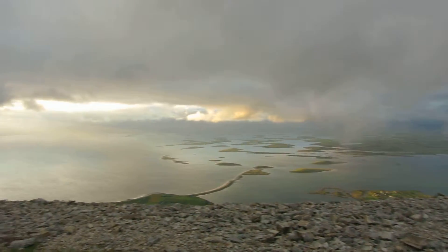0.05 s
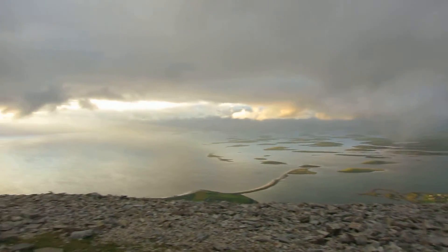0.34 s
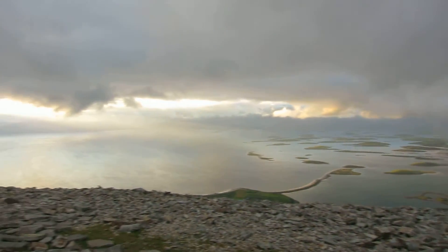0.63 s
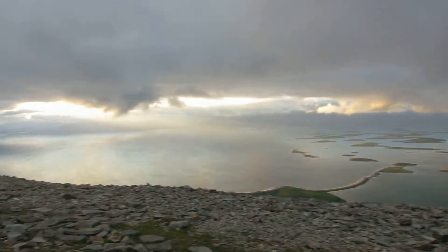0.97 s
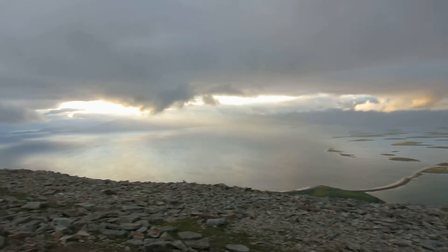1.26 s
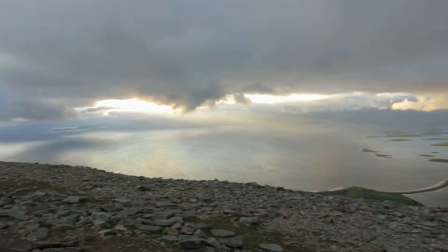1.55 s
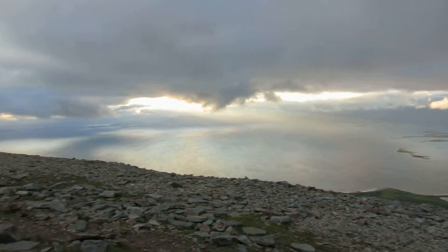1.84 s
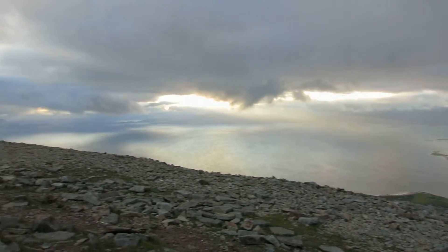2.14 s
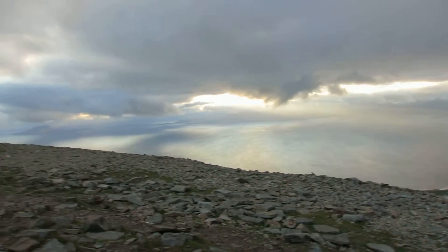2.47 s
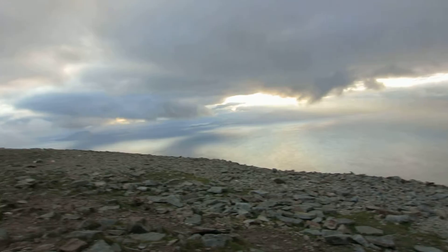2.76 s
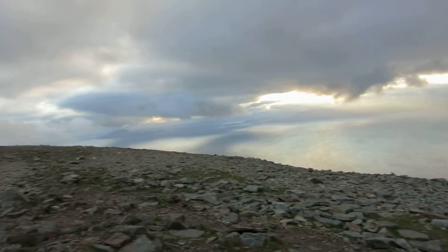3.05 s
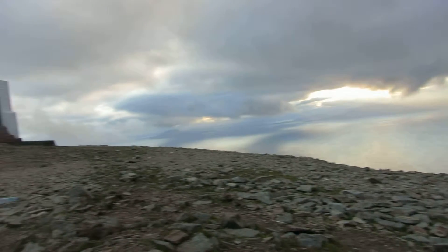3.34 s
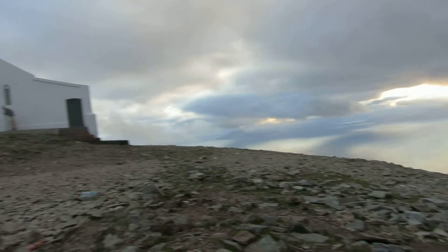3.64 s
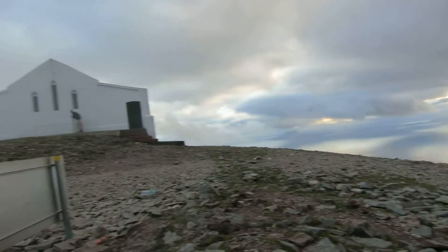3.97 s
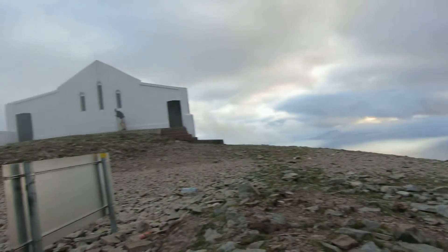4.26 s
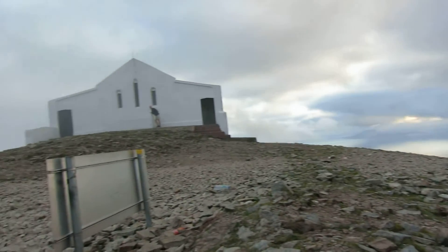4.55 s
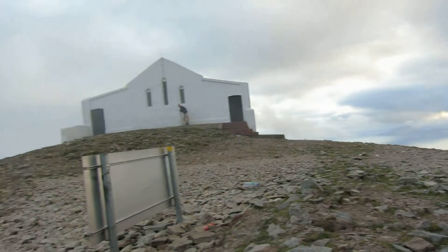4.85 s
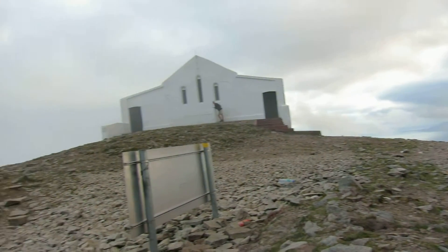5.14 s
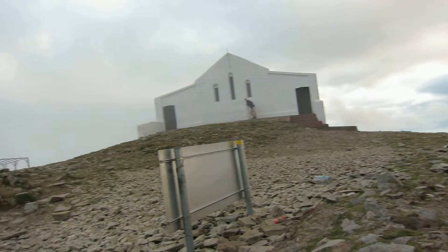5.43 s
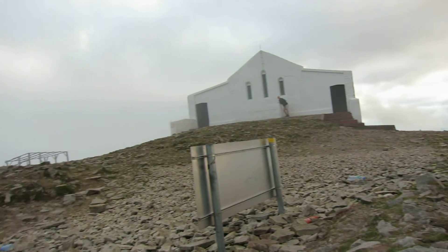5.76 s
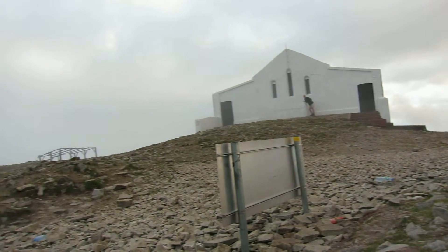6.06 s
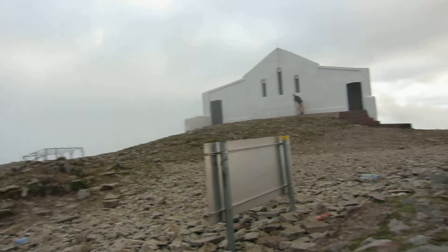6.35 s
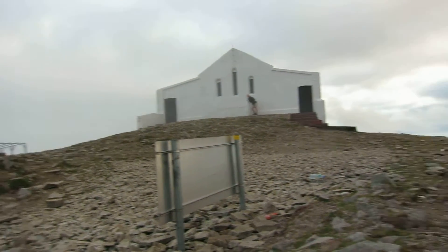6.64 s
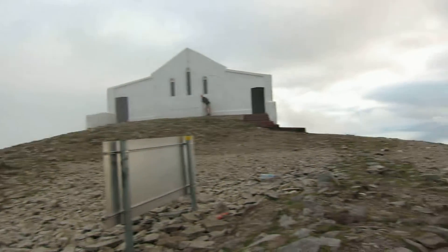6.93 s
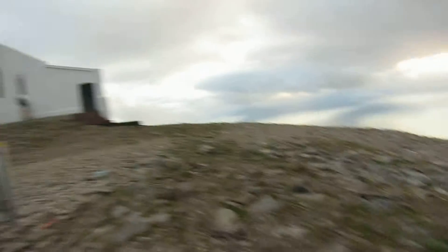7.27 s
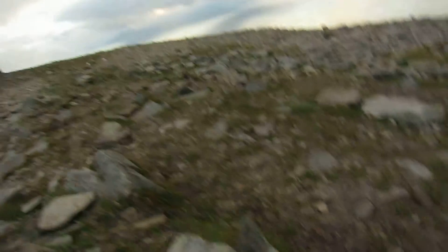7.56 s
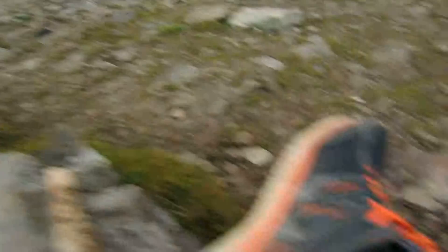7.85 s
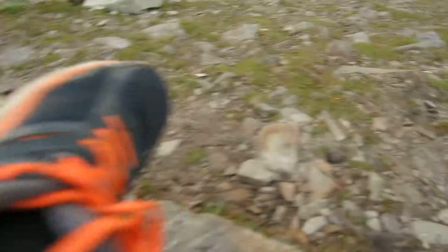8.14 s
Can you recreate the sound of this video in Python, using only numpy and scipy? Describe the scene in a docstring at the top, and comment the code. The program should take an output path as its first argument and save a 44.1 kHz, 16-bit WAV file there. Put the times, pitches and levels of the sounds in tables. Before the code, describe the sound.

Wind rumbles, thumps and crackles on the microphone in uneven gusts, dying down near the end as fabric swishes and stones click softly.

```python
"""Summit wind on a microphone

Gusty wind on a bare stony summit buffets the two microphone ports of a hand-held camera. One flow
strength drives the turbulence: a slow swell, plus gusts, minus stalls. Faster air carries smaller
eddies, so the rumble opens into a roar with overload crackle; hard eddies slap the ports. Near the end
the camera swings into shelter, where clothing rustles and small stones tick over a faint rush of air."""
import sys
import numpy as np
from scipy.fft import rfft, irfft, next_fast_len
from scipy.io import wavfile
from scipy.ndimage import uniform_filter1d, minimum_filter1d, map_coordinates

SR = 44100
rng = np.random.default_rng(int(sys.argv[2]) if len(sys.argv) > 2 else 0)


def unload_wav(signal):
    """Save mono or channel-first audio to the path in sys.argv[1] as 16-bit WAV at rate SR, clipped to [-1, 1]."""
    wavfile.write(
        sys.argv[1],
        SR,
        np.round(np.clip(np.atleast_2d(signal).T, -1, 1) * 32767).astype(np.int16),
    )


N = 366030

# Levels in the tables are relative; each source adds its own gain.
# slow swell of the wind: (time [s], flow [dB], bass level [dB])
SWELL = [(0, -8, 4.5), (.25, -6.5, 3.5), (.7, -3, 5), (1.25, -6.5, 4.5), (1.75, -4, 2), (2.4, -2, 2),
         (2.85, 3, -1), (3.15, -2, -1), (3.78, -7.5, 0.5), (4.1, -0.5, -2), (4.85, 1, -1.5), (5.3, 2, -1.5),
         (5.6, -.5, -2.5), (6.4, -4, 2), (7.08, -3.5, -3), (7.19, -20, -7), (7.48, -20, 4), (7.72, -35, 5),
         (8.1, -45.5, 8.5), (8.3, -44, 10)]
# gusts riding on the swell: (start [s], hold [s], flow gained [dB])
GUST_EVENTS = [(0.126, 0.011, 2.5), (0.238, 0.075, 1), (0.619, .085, 4), (0.849, 0.015, 4.5),
               (0.966, 0.11, 6.5), (1.442, .053, 2.5), (1.531, .048, 4.5), (1.852, .16, 6),
               (2.316, 0.042, 4), (2.589, 0.062, 3.5), (3.082, 0.091, 2.5), (3.441, 0.018, 3),
               (3.936, 0.068, 4.5), (4.149, 0.038, 3.5), (4.298, 0.081, 3.5), (4.65, 0.062, 3.5),
               (4.969, .13, 3), (5.177, .16, 1.5), (5.46, 0.02, 15), (5.787, 0.078, 3.5), (5.978, 0.14, 4),
               (6.39, .026, 6), (6.509, .075, 5.5), (6.631, 0.043, 6.5), (6.767, 0.031, 7.5),
               (6.854, .026, 5.5), (6.944, .095, 4), (7.344, 0.022, 7), (7.416, 0.1, 11.5),
               (7.533, 0.1, 14.5), (7.67, .01, 19.5), (7.757, 0.039, 13.5), (7.855, 0.0112, 18),
               (7.914, 0.054, 8), (8.042, 0.018, 17), (8.246, 0.028, 15.5)]
# the flow leaves the ports, then snaps back: (time of snap [s], length [s], flow lost [dB])
STALL_EVENTS = [(.036, 0.036, 15), (0.116, 0.048, 6), (0.375, 0.061, 15), (0.447, 0.045, 11),
                (0.531, 0.02, 13), (0.611, 0.052, 6.5), (0.84, 0.06, 11), (0.893, 0.021, 8),
                (1.389, .12, 17.5), (1.447, 0.062, 4), (1.518, 0.015, -1), (1.724, 0.028, 4.5),
                (2.297, 0.14, 5.5), (2.442, 0.078, 12.5), (3.253, 0.042, 8.5), (3.443, 0.083, 8),
                (3.944, 0.01, 4.5), (4.244, 0.034, 8), (4.916, 0.06, 9), (5.544, .15, 18),
                (5.914, 0.022, 8), (6.157, 0.063, 8.5), (6.385, 0.1, 6.5), (6.511, .05, 2.5),
                (6.744, 0.074, 6.5), (6.844, 0.028, 5.5)]
# spectrum of the turbulence: (frequency [Hz], level [dB])
TURBULENCE_SPECTRUM = [(25, -28), (45, -12), (70, -2.5), (130, 3), (200, 2.5), (350, -0.5), (600, -5),
                       (1000, -10.5), (2000, -24.5), (3000, -40), (4500, -57), (15000, -108)]
# growth of each eddy size with air speed: (frequency [Hz], slope [dB/dB])
EDDY_GROWTH = [(60, -0.2), (200, 0.09), (500, 0.29), (1000, 0.6), (2000, 1.32), (4000, 2.5)]
# colour of the overload crackle: (frequency [Hz], gain [dB])
CRACKLE_RESPONSE = [(200, -4.5), (1000, 4.5), (2500, 9), (5000, -5.5), (9000, -23), (15000, -43)]
# which port faces the wind: (time [s], bias to the left [dB])
WINDWARD_BIAS = [(0.0, 0), (0.2, 4.0), (1.4, -2.5), (1.7, 3.5), (2.3, -2), (2.8, 1), (2.9, -2), (3.6, -1.0),
                 (3.7, 1), (4.0, 0.5), (5.4, 2), (5.5, -1.5), (5.9, 2), (6.0, -4), (6.1, -1), (6.3, -1.5),
                 (6.4, 3), (7.3, 2.5), (7.4, -1.5), (7.6, -6), (8.0, 1.5), (8.3, -3)]
# spectrum of the distant air: (frequency [Hz], level [dB])
AIR_SPECTRUM = [(30, -6.5), (300, 12.5), (1000, -8), (3000, -18.5), (8000, -28), (15000, -43.5)]
# hard eddies: (time [s], level [dB], extra level of the thump [dB])
SLAP_EVENTS = [(.535, -44, 22.5), (0.621, -25.5, 24), (.768, -34, 16.5), (0.855, -28.5, 6),
               (.978, -30, 22.5), (1.45, -27, 15), (1.491, -31, 6), (1.546, -39, 19.5), (1.679, -33, 23),
               (1.937, -25.5, 15.5), (2.354, -12.5, 6), (2.447, -34.5, 26), (2.604, -28, 24),
               (3.135, -25, 10), (3.963, -31.5, 25), (4.163, -27, 18), (4.693, -22, 13),
               (5.18, -21.5, -2.5), (5.724, -26.5, 5.5), (5.834, -27, 3), (5.987, -25.5, 12.5),
               (6.028, -20.5, 11.5), (6.158, -27.5, 18.5), (6.278, -37, 27.5), (6.791, -30, 4),
               (7.036, -26, 4)]
# spectrum of a slap's crack: (frequency [Hz], level [dB])
CRACK_SPECTRUM = [(200, -11), (900, 11.5), (2000, 4), (3200, -9), (5000, -16), (9000, -50), (15000, -60.5)]
# swishes of clothing: (start [s], hold [s], level [dB])
SWISH_EVENTS = [(7.133, .09, -75.5), (7.222, 0.048, -69.5), (7.39, .13, -74.5), (7.515, 0.17, -70.5),
                (7.88, .11, -78), (8.028, 0.077, -70), (8.265, 0.033, -69)]
# spectrum of sliding cloth: (frequency [Hz], level [dB])
CLOTH_SPECTRUM = [(500, -21), (2000, -1), (4500, -3), (7000, -7.5), (10500, -12.5), (15000, -24)]
# contacts of small stones: (time [s], level [dB])
STONE_EVENTS = [(7.2618, -55), (7.8076, -55), (7.87, -39.5), (7.959, -59), (7.996, -41), (8.1284, -38.5),
                (8.243, -50.5), (8.2746, -36.5)]
# spectrum of a stone's tick: (frequency [Hz], level [dB])
STONE_SPECTRUM = [(500, 6.5), (1500, 11.5), (4000, 7), (8000, -9.5), (15000, -31.5)]
# stereo widening of the difference between the ports: (frequency [Hz], gain [dB])
SIDE_RESPONSE = [(100, 8.5), (500, 8.5), (1200, 8), (2200, 5.5), (4000, 1.5), (7000, -2), (14000, 2.5)]


def amp(db):
    """Amplitude ratio of a level in decibels."""
    return np.exp(np.asarray(db) * (np.log(10) / 20))


def along(points, hz):
    """Interpolation of (frequency [Hz], value) points on a logarithmic frequency axis."""
    knots_hz, values = np.transpose(points)
    return np.interp(np.log(hz + 1), np.log(knots_hz + 1), values)


def curves(rows):
    """Linear interpolation in time: one value per sample for each column after the first."""
    times, *columns = np.transpose(rows)
    return [np.interp(np.arange(N) / SR, times, column) for column in columns]


def wobble(rate):
    """Smooth random modulation: a spline through rate Gaussian knots a second."""
    return map_coordinates(rng.standard_normal(int(N * rate / SR) + 4), [np.arange(N) * rate / SR])


def envelope(start, hold, attack_s, release_s):
    """Linear ramps: a rise from start, and a fall that begins hold seconds after start."""
    age = np.arange(N) / SR - start
    return np.clip(age / attack_s, 0, 1) * np.clip(1 - (age - hold) / release_s, 0, 1)


def filtered(x, response):
    """Linear filtering: the spectrum of x is multiplied by a frequency response."""
    size = next_fast_len(N + SR // 4)
    return irfft(rfft(x, size) * response(np.fft.rfftfreq(size, 1 / SR)), size)[..., :N]


def coloured(x, spectrum):
    """Spectral shaping of x by (frequency [Hz], gain [dB]) points."""
    return filtered(x, lambda hz: amp(along(spectrum, hz)))


def noise(spectrum):
    """Incoherent coloured noise at the two ports, normalised to rms 1."""
    x = coloured(rng.standard_normal((2, N)), spectrum)
    return x / np.sqrt(np.mean(x ** 2) + 1e-20)


def eddy_sizes(x, count=9):
    """Octave decomposition: (centre [Hz], band) pairs whose overlapping bands sum to x."""
    size = next_fast_len(N, real=True)
    spectrum = rfft(x.astype(np.float32), size)
    log_hz = np.log(np.fft.rfftfreq(size, 1 / SR) + 1)
    centres = 50 * 2. ** np.arange(count)
    for centre, weights in zip(centres, np.eye(count)):
        window = np.interp(log_hz, np.log(centres), weights).astype(np.float32)
        yield centre, irfft(spectrum * window, size)[:, :N]


def flow():
    """Unsteady flow at the ports [dB]: swell plus gusts minus stalls; a weak swell wavers more."""
    swell_db = curves(SWELL)[0]
    unrest_db = 0.98 + 0.028 * np.maximum(-swell_db, 0)
    flow_db = swell_db + unrest_db * wobble(34)
    for start, hold, db in GUST_EVENTS:
        flow_db += db * envelope(start, hold, attack_s=0.0044, release_s=0.016)
    snap_s = 0.0044
    for end, length, db in STALL_EVENTS:
        flow_db -= db * envelope(end - length, length - snap_s / 2, attack_s=0.016, release_s=snap_s)
    return flow_db


def fronts(sag_s=0.024, surge_s=0.0092, sag_share=0.23, stall_jump_db=4.5, gust_jump_db=1.0):
    """Overshoot and relaxation [dB]: as a stall ends or a gust opens, the flow sags, jumps, settles."""
    t = np.arange(N) / SR
    flow_db = np.zeros(N)
    jumps = [(time, stall_jump_db) for time, _, _ in STALL_EVENTS]
    jumps += [(time, gust_jump_db) for time, _, _ in GUST_EVENTS]
    for time, jump_db in jumps:
        near = slice(max(round((time - .15) * SR), 0), round((time + .15) * SR))
        age = t[near] - time
        sag = -sag_share * np.exp(-abs(age) / sag_s)
        surge = (1 - sag_share) * np.exp(-abs(age) / surge_s)
        flow_db[near] += jump_db * np.where(age < 0, sag, surge)
    return uniform_filter1d(flow_db, size=90)


def buffeting(level_db=-25, flow_slope=0.59, crest_db=7.5, bass_hz=350):
    """Turbulent cascade: eddies within eddies press on each port, the smallest in the sharpest bursts."""
    flow_db, bass_db = flow(), curves(SWELL)[1]
    gust_db = 1.5 + flow_db - 0.28 * bass_db  # bass-heavy air is also duller
    # large swirls cover both ports, small ones only one; none outruns the free wind
    swirl_db = 1.33 * wobble(65) + 2.0 * np.array([wobble(190), wobble(190)])
    swirl_db = np.minimum(swirl_db, crest_db * np.tanh(np.abs(swirl_db) / crest_db))
    intermittency = np.clip(1 - 0.098 * gust_db, .7, 1.45)  # weak flow comes in separate puffs
    swirl_db = intermittency * swirl_db + fronts()
    speed_db = np.minimum(gust_db + swirl_db, 11)
    spit_db = 9 * np.array([wobble(600), wobble(600)])
    pressure = crackle(gust_db + 0.55 * swirl_db)
    for hz, band in eddy_sizes(noise(TURBULENCE_SPECTRUM)):
        fineness = hz / (hz + 1100)  # only small eddies follow the fastest changes
        flutter_db = 0.54 * (2.5 - fineness) * swirl_db + fineness * spit_db
        weight_db = bass_db / (1 + (hz / bass_hz) ** 2)
        pressure += band * amp(along(EDDY_GROWTH, hz) * speed_db + flutter_db + weight_db)
    return pressure * amp(level_db + flow_slope * flow_db)


def crackle(speed_db, base_rate_hz=70, crowding=2.2, growth=2.9):
    """Overload: strong gusts make the microphone spit in clumps, denser and louder in faster air."""
    speed_db = np.minimum(speed_db, 9)
    clump_db = 4.5 * np.minimum([wobble(260), wobble(260)], 2)
    spits = rng.random((2, N)) < base_rate_hz / SR * amp(crowding * speed_db + clump_db)
    scatter_db = 4.0 * np.minimum(rng.exponential(size=(2, N)), 3)
    sizes = amp(-18 + growth * speed_db + clump_db + scatter_db)
    return coloured(spits * sizes * rng.choice([-1, 1], (2, N)), CRACKLE_RESPONSE)


def port_shares(shading=1.2):
    """Wind shadowing: the windward port takes the larger share of a constant total power."""
    gains = amp(shading * curves(WINDWARD_BIAS)[0] * np.array([[1], [-1]]))
    return gains / np.sqrt(np.mean(gains ** 2, axis=0))


def distant_air(level_db=-65.5):
    """Flow noise: air passing over the slopes makes a faint, steady rush."""
    return amp(level_db) * noise(AIR_SPECTRUM)


def slaps(crack_decay_s=0.00045, typical_width_s=0.00062):
    """Pressure transients: a hard eddy gives one bipolar thump and a short crack as it breaks."""
    t = np.arange(-SR // 50, SR // 50) / SR
    cracks, thumps = np.zeros((2, 2, N + SR))
    for time, db, extra_db in SLAP_EVENTS:
        side, polarity, stretch = rng.uniform(-1, 1, 3)
        angle = (side + 1) * np.pi / 4
        pan = np.array([[np.cos(angle)], [np.sin(angle)]])
        start = max(round(time * SR) - t.size // 2, 0)
        span = slice(start, start + t.size)
        widths = t / (typical_width_s * 2 ** (stretch / 2))
        swing = 2 * np.sign(polarity) * widths * np.exp(-widths ** 2 / 2)
        thumps[int(side > 0), span] += amp(db + extra_db - 3) * swing  # nearer port only
        cracks[:, span] += 2 * pan * amp(db + 6) * np.exp(-np.abs(t) / crack_decay_s)
    return thumps[:, :N] + cracks[:, :N] * noise(CRACK_SPECTRUM)


def clothing(gain_db=3.5, rub_db=2.0, scratch_db=3.0):
    """Stick-slip friction: fabric slides in small catches while the camera swings down."""
    sliding = sum(amp(db) * envelope(start, hold, attack_s=0.036, release_s=0.069)
                  for start, hold, db in SWISH_EVENTS)
    catches_db = rub_db * wobble(39) + scratch_db * wobble(400)
    return sliding * amp(gain_db + catches_db) * noise(CLOTH_SPECTRUM)


def stones(t60_s=0.016, gain_db=-5):
    """Heavily damped impacts: loose stones touch with dry ticks that do not ring."""
    t = np.arange(SR // 10) / SR
    ticks = np.zeros(N + SR)
    for time, db in STONE_EVENTS:
        ticks[round(time * SR):][:t.size] += amp(db + gain_db - 60 * t / t60_s)
    return ticks[:N] * noise(STONE_SPECTRUM)


def scene():
    """Superposition: the pressures of all sources add at each port."""
    return port_shares() * buffeting() + slaps() + clothing() + stones() + distant_air()


def record(dry, low_cut_hz=41, top_hz=15300, ceiling=.88):
    """Filtering and limiting: the camera cuts deep rumble, widens the image, curbs peaks and top end."""
    left, right = filtered(dry, lambda hz: hz ** 2 / np.hypot(hz ** 2, low_cut_hz ** 2))
    mid = (left + right) / 2
    side = coloured((left - right) / 2, SIDE_RESPONSE)  # puts the wind in opposite phase left and right
    wide = np.array([mid + side, mid - side])
    needed_gain = ceiling / np.maximum(np.abs(wide).max(axis=0), ceiling)
    smooth_gain = uniform_filter1d(minimum_filter1d(needed_gain, size=260), size=260)
    return filtered(wide * smooth_gain, lambda hz: hz < top_hz)


dry = scene()
out = record(dry)
unload_wav(out)
```